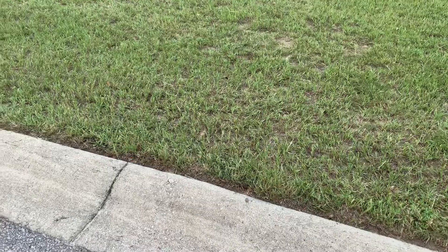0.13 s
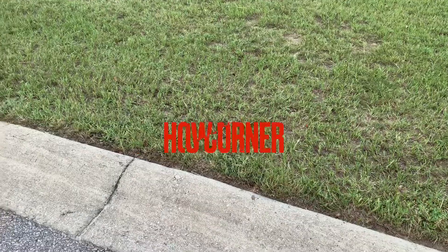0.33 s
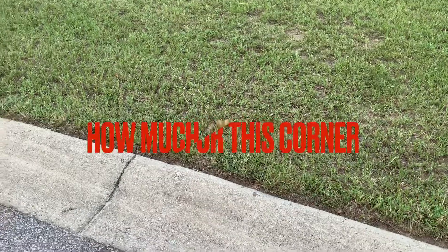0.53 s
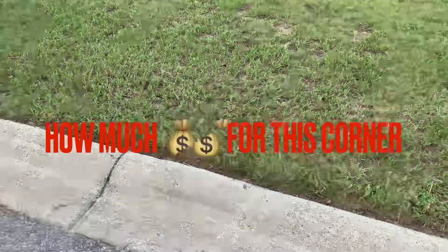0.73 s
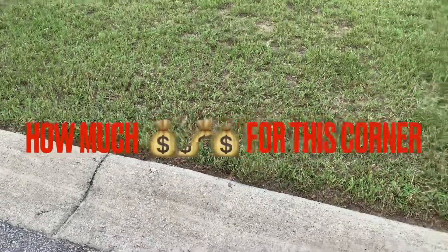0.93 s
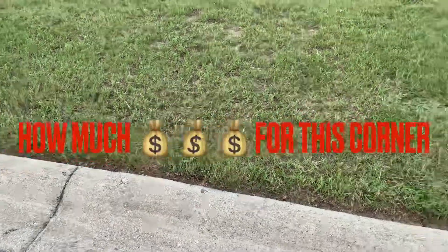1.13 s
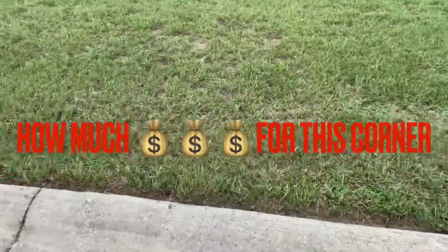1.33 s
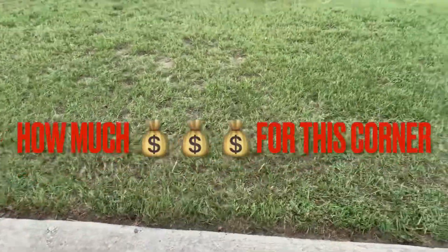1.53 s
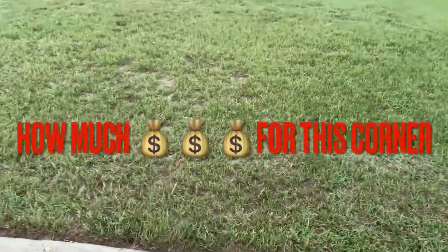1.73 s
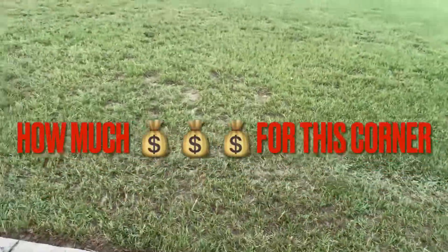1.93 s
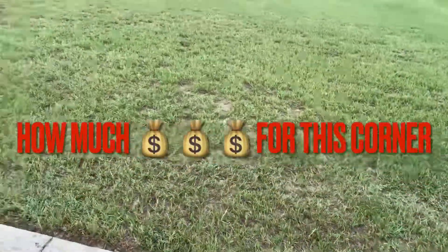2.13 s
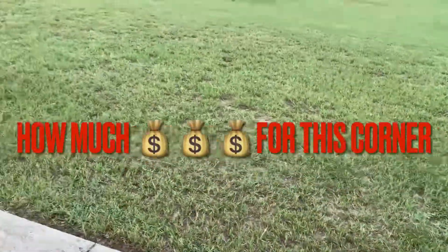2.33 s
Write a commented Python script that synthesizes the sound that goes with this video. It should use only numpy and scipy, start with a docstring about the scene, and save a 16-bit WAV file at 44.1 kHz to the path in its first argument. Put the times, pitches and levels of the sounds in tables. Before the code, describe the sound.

A small four-stroke lawn engine, already running, fades in quickly after a brief silence and chugs steadily outdoors; fan hum and a tinny rasp surround it, then dull wind thuds hit the handheld stereo microphone.

```python
"""After a brief silence a single-cylinder four-stroke lawn engine fades in quickly outdoors, already running.
Each cycle brings low thumps, pitch-falling putts, muffler ringing and gated gas and valve noise;
sinusoids at multiples of the firing rate and shaped noise make the hum and rush of its fan, with a tinny rasp.
From about 0.6 s the bass rises and dull thuds join the breeze at the two microphone ports;
toward the end the exhaust's upper bark and the bass subside."""
import sys
import numpy as np
from scipy import signal
from scipy.fft import rfft, irfft
from scipy.io import wavfile

SR = 44100
rng = np.random.default_rng(int(sys.argv[2]) if len(sys.argv) > 2 else 0)


def bounce(signal):
    """Save signal as a 16-bit WAV file at the path given by the first command-line argument."""
    frames = np.transpose(np.atleast_2d(signal))
    limited = np.clip(frames, -1, 1)
    pcm = np.round(limited * 32767).astype(np.int16)
    wavfile.write(sys.argv[1], SR, pcm)


N = 105795
T, HZ = np.arange(N) / SR, np.fft.rfftfreq(N, 1 / SR)

# Wind turbulence at the ports, before the bass curve: (frequency [Hz], density [dB per Hz])
WIND_SPECTRUM = [(15, -84), (27, -79), (45, -52.5), (72, -50), (110, -59.5), (180, -59), (300, -62.5),
                 (800, -95), (4000, -130)]
# Common level of wind and boom: (time [s], level [dB])
BASS_LEVEL = [(0, -7), (.59, -14.5), (.625, 2), (.9, 0.5), (1, 1), (1.12, 6), (1.24, 0.5), (1.31, .5),
              (1.45, 0), (1.55, -2), (1.82, -1.5), (1.86, -4), (2.12, -7.5), (2.16, -4.5), (2.4, -3.5)]
# Heaviest low thuds at the microphone: (time [s], peak level [dB], frequency [Hz])
THUDS = [(0.638, -22.5, 93), (0.687, -22, 81.6), (0.782, -29.5, 75), (0.834, -23.5, 81.6), (.897, -21, 85),
         (1.116, -28, 70), (1.166, -28.5, 76), (1.306, -18, 70.4), (1.366, -22, 80), (1.391, -18, 81),
         (1.46, -18, 84), (1.618, -25.5, 91), (1.822, -21, 89), (2.153, -25, 65), (2.267, -25, 65)]
THUD_SIGMA_S = 0.0065

# Fan and blade tones: (multiple of firing rate, rounded in use [1], level [dB], waver [0-1])
FAN_TONES = [(12, -35.5, 0.29), (19, -45.5, 0.6), (24, -39, 0.96), (32, -41.5, 0.1), (36, -48, 0.9),
             (73.6, -62, 0.3), (87.8, -55, 0.4), (95.4, -57, 0.4), (118.6, -57, 0.9)]
TONE_WAVER_HZ = 6.9
# Fan rush before its level curves: (frequency [Hz], density [dB per Hz])
RUSH_SPECTRUM = [(20, -69), (60, -70), (190, -60), (280, -67), (355, -65.5), (440, -66), (490, -61.5),
                 (700, -61.5), (1000, -66.5), (1140, -69), (1550, -72), (1680, -75.5), (1850, -74.5),
                 (2600, -75.5), (3200, -82), (4000, -85.5), (5000, -88), (7000, -91.5), (8400, -87),
                 (9500, -94), (10600, -101), (12300, -98), (15300, -103)]
# Overall level of the rush: (time [s], level [dB])
RUSH_LEVEL = [(.1, 1), (.5, 1.5), (.9, 0), (1.2, -0.5), (1.5, 0), (1.9, 0), (2.4, 0)]
# Level of the rush's top treble: (time [s], level [dB])
TREBLE_LEVEL = [(.1, -2.5), (.45, -2), (.9, 2.5), (1.3, 3), (1.8, 0.5), (2.4, 2.5)]
TREBLE_HZ = 8060
# Level of the rush near 3 kHz: (time [s], level [dB])
RIM_LEVEL = [(.1, -3), (.8, 0.5), (1.5, -2), (1.8, 4), (2.4, 0.5)]
RIM_HZ, RIM_HALF_WIDTH_HZ = 2820, 300
FLUTTER_DB, FLUTTER_HZ, SWELL_DB, SWELL_HZ = 1, 154, 1.22, 5.5
# Housing whistles in the air stream: (frequency [Hz], pole-pair width [Hz], level [dB])
WHISTLES = [(1887, 26, -59.5), (2770, 53, -59), (4214, 53, -66), (5350, 28, -65.5)]

# Tinny rasp, its colour shifting as the microphone moves: (time [s], centre [Hz], level [dB])
RASP = [(0.099, 2160, -41.5), (0.401, 2155, -45), (.7, 1995, -44.5), (.98, 1965, -42.5),
        (1.12, 2060, -40.5), (1.25, 2120, -37), (1.42, 2040, -41), (1.6, 2100, -42), (1.75, 2520, -57),
        (1.949, 2540, -47.5), (2.149, 2570, -48), (2.4, 2440, -44)]
RASP_POLE_WIDTH_HZ, RASP_PULSE_DB, RASP_PLACE = 320, 2, 0.91  # place in cycles
RASP_GRAIN_DB, RASP_GRAIN_HZ = 1.9, 110
RASP_EVEN = 0.24  # 0 = the band flickers freely, 1 = its envelope is constant

# Engine speed: (time [s], firing rate [firings per second])
FIRING_RATE = [(0.0, 18.561), (0.5, 18.685), (0.66, 17.96), (0.85, 17.978), (0.96, 18.253), (1.08, 17.951),
               (1.17, 18.488), (1.26, 17.913), (1.34, 18.755), (1.44, 18.166), (1.54, 18.441),
               (1.68, 17.91), (1.86, 18.407), (1.94, 18.108), (2.07, 18.552), (2.27, 17.871), (2.4, 18.3)]
START_CYCLE = .235
FIRING_SPREAD_DB, TIMING_SPREAD_S = -0.3, 0.00017
# Deep boom, before the bass curve: (place [cycles], frequency [Hz], pole-pair width [Hz], level [dB])
BOOM = [(0.759, 77, 89, -50)]
BOOM_SPREAD_DB = -1.5
# Low thumps in block and deck: (place [cycles], frequency [Hz], pole-pair width [Hz], level [dB])
THUMPS = [(0.57, 68.4, 42, -40), (.56, 165, 66.5, -39), (0.55, 264, 37, -47), (.05, 390, 35, -41.5)]

# Exhaust strength, for putts and muffler: (time [s], level [dB])
EXHAUST_EFFORT = [(.14, -1.5), (.3, -1.5), (.38, -7.5), (.52, -5.5), (.58, -5.5), (.68, -1.5), (.96, 3),
                  (1.06, -1), (1.13, -0.5), (1.22, -9), (1.34, -8.5), (1.42, -1.5), (1.52, -7.5), (1.62, 2),
                  (1.69, -12.5), (1.78, -5.5), (1.87, -0.5), (1.98, -6), (2.12, 4.5), (2.22, -3.5),
                  (2.29, -0.5), (2.34, -13), (2.4, 6)]
# Muffler modes: (place [cycles], frequency [Hz], pole-pair width [Hz], level before bark [dB])
MUFFLER = [(0.9, 588, 60, -45), (.78, 795, 42, -47), (.75, 990, 80, -46.5)]
# Gas and valve noise: (place [cycles], Gaussian sigma [cycles], frequency [Hz], pole-pair width [Hz],
# level before bark [dB])
BURSTS = [(1.03, .1, 736, 240, -43), (0.74, 0.061, 1453, 250, -52.5), (0.95, 0.072, 1310, 280, -48.5),
          (0.7, 0.16, 1826, 260, -50.5), (0.9, 0.13, 3070, 760, -54), (0.65, 0.085, 4480, 1600, -60),
          (0.1, 0.049, 8700, 1300, -64)]
# Falling putts: (place [cycles], nominal first [Hz], nominal last [Hz], fall time constant [s],
# peak time [s], Gaussian sigma [s], roughness [0-1], level before bark [dB])
PUTTS = [(.7, 1650, 555, 0.007375, 0.017, 0.01, .27, -37), (0.02, 1400, 350, .007, 0.027, 0.015, .5, -47)]
PUTT_S, PUTT_PITCH_SPREAD, PUTT_ROUGH_HZ = 0.043, 0.026, 101
# Exhaust-pipe response to the putts: (frequency [Hz], gain [dB])
PIPE = [(380, -1), (435, -2), (500, -2), (590, 4.5), (680, -5), (790, 2), (880, -2), (980, 7.5),
        (1150, -4.5), (1400, 0)]
# Level of the exhaust's upper bark: (time [s], level [dB])
BARK_LEVEL = [(.1, -3), (.5, 6), (.7, 1), (1, -2.5), (1.15, 2), (1.4, 3), (1.7, 2.5), (2, -0.5),
              (2.4, -6.5)]
BARK_HZ, BARK_HALF_WIDTH_HZ = 850, 210

# Phase between ports: (frequency [Hz], lead of left over right [rad])
PORT_LEAD = [(20, 0), (200, .15), (290, .5), (430, 2.3), (600, 1.4), (950, 1.4), (1500, .7), (2000, -.6),
             (2900, -2.4), (6000, -2.3), (6900, -3.05), (7500, -3.3), (9200, -6.2), (10200, -6.4),
             (10900, -9.3), (12200, -9.5), (13300, -12.4), (15200, -12.8)]
# Level between ports: (frequency [Hz], left minus right [dB])
PORT_TILT = [(20, -5), (110, 2), (170, -4), (270, -3.5), (350, -3.5), (435, 4.5), (520, -6), (600, 8.5),
             (700, -5), (900, 3), (1200, 0.5), (2150, 4.5), (3000, 0.5), (5000, 1), (15000, -1)]
# Noise shared by the ports: (frequency [Hz], coherence amplitude [0-1])
PORT_LIKENESS = [(20, .96), (200, .94), (300, .65), (600, .8), (1000, .72), (1400, .55), (2200, .8),
                 (3300, .62), (4600, .15), (6000, .6), (7300, .92), (9000, .92), (11500, .97), (15000, .9)]
FADE_START_S, FADE_S = 0.072, 0.072
EDGE_HZ = 15450


def amp(db):
    """Logarithmic level law: decibels to linear gain."""
    return 10 ** (np.asarray(db) / 20)


def unit(x):
    """Power normalization: scales a signal to rms 1."""
    return x / np.sqrt(np.mean(x ** 2) + 1e-20)


def over_time(points):
    """Linear interpolation of a time curve at every sample."""
    return np.interp(T, *np.transpose(points))


def over_pitch(points):
    """Interpolation of a spectrum along logarithmic frequency."""
    f, value = np.transpose(points)
    return np.interp(np.log(HZ + 1), np.log(f + 1), value)


def shaped(x, gain):
    """Linear filtering: multiplication of a spectrum by a frequency response."""
    return irfft(rfft(x) * gain, N)


def bell(centre_hz, half_width_hz):
    """Band selection by a flat-topped magnitude response, one half at its half width."""
    return 1 / (1 + ((HZ - centre_hz) / half_width_hz) ** 4)


def resonance(hz, width):
    """Causal damped resonance: one pole pair applied twice."""
    return (1j * HZ * width / (hz ** 2 - HZ ** 2 + 1j * HZ * width)) ** 2


def drift(rate_hz):
    """Random modulation: low-passed noise of zero mean and rms 1."""
    return unit(shaped(rng.standard_normal(N), (HZ > 0) / (1 + (HZ / rate_hz) ** 4)))


def air():
    """Partial coherence: white noise that two ports share in part."""
    a, b = rng.standard_normal((2, N))
    same = np.clip(over_pitch(PORT_LIKENESS), 0, 1)
    right = shaped(a, same) + shaped(b, np.sqrt(1 - same ** 2))
    return np.array([a, right])


def wind():
    """Turbulent pressure: predominantly low-frequency noise on the microphone."""
    return shaped(air(), amp(over_pitch(WIND_SPECTRUM)) * np.sqrt(SR / 2))


def thuds():
    """Transient pressure pulses: Gaussian-gated low sines, alike before the port response."""
    out = np.zeros(N)
    for (s, db, hz), phase in zip(THUDS, rng.random(len(THUDS))):
        gate = np.exp(-.5 * ((T - s) / THUD_SIGMA_S) ** 2)
        out += amp(db) * gate * np.sin(2 * np.pi * (hz * (T - s) + phase))
    return out


def fan_hum(cycles):
    """Harmonic radiation: randomly wavering tones locked to the engine cycle."""
    out = np.zeros(N)
    for multiple, db, waver in FAN_TONES:
        wander = 1 + waver * (drift(TONE_WAVER_HZ) + 1j * drift(TONE_WAVER_HZ))
        tone = wander * np.exp(2j * np.pi * round(multiple) * cycles)
        out += amp(db) * unit(tone.real)
    return out


def fan_rush():
    """Broadband flow noise: shaped noise whose whole level and upper bands vary."""
    flutter = unit(amp(FLUTTER_DB * drift(FLUTTER_HZ) + SWELL_DB * drift(SWELL_HZ)))
    rush = shaped(air(), amp(over_pitch(RUSH_SPECTRUM)) * np.sqrt(SR / 2))
    treble = shaped(rush, 1 - 1 / (1 + (HZ / TREBLE_HZ) ** 6))
    rush = rush + (amp(over_time(TREBLE_LEVEL)) - 1) * treble
    rush = rush + (amp(over_time(RIM_LEVEL)) - 1) * shaped(rush, bell(RIM_HZ, RIM_HALF_WIDTH_HZ))
    return amp(over_time(RUSH_LEVEL)) * flutter * rush


def housing_whistles():
    """Resonance in an air stream: narrow modes excited by one noise."""
    stream = air()
    return sum(amp(db) * unit(shaped(stream, resonance(hz, width))) for hz, width, db in WHISTLES)


def rasp(cycles):
    """Amplitude modulation: a thin noise band shaken once each revolution, twice a cycle."""
    s, hz, db = np.transpose(RASP)
    pulse_db = RASP_PULSE_DB * np.cos(4 * np.pi * (cycles - RASP_PLACE))
    shake = amp(pulse_db + RASP_GRAIN_DB * drift(RASP_GRAIN_HZ))
    # Noise is low-passed in a frame that rotates at the moving centre frequency.
    carrier = np.exp(2j * np.pi * np.cumsum(np.interp(T, s, hz)) / SR)
    pole = np.exp(-np.pi * RASP_POLE_WIDTH_HZ / SR)
    band = carrier * signal.lfilter([1], np.poly([pole, pole]), air() / carrier)
    evened = band.real / (abs(band) + 1e-9) ** RASP_EVEN
    return amp(np.interp(T, s, db)) * unit(shake * evened)


def uneven(cycles, spread_db):
    """Cyclic variation: a random gain interpolated from cycle to cycle."""
    chance = rng.standard_normal(size=64)
    return amp(spread_db * np.interp(cycles, np.arange(len(chance)), chance))


def passes(cycles, place):
    """Phase crossing: the samples at which each cycle reaches a place."""
    return np.flatnonzero(np.diff(np.floor(cycles - place)))


def firings(cycles, force, modes):
    """Impulse excitation: a slightly mistimed pulse per cycle rings each mode."""
    out = np.zeros(N)
    for place, hz, width, db in modes:
        at = passes(cycles, place)
        late = np.round(rng.standard_normal(size=64)[:len(at)] * TIMING_SPREAD_S * SR).astype(int)
        at = np.clip(at + late, 0, N - 1)
        pulses = np.zeros(N)
        pulses[at] = force[at]
        out += amp(db) * unit(shaped(pulses, resonance(hz, width)))
    return out


def chuffs(cycles, force):
    """Periodic flow and valve noise: resonant bands gated at fixed places in the cycle."""
    out = np.zeros((2, N))
    for place, sigma, hz, width, db in BURSTS:
        distance = (cycles - place + .5) % 1 - .5
        gate = np.exp(-.5 * (distance / sigma) ** 2)
        out += amp(db) * unit(shaped(air(), resonance(hz, width)) * gate * force)
    return out


def putts(cycles, force):
    """Frequency glide: tones of random pitch fall through the pipe's response each cycle."""
    t, out = np.arange(0, PUTT_S, 1 / SR), np.zeros(N)
    for place, first_hz, last_hz, fall_s, peak_s, sigma_s, rough, db in PUTTS:
        hz = last_hz + (first_hz - last_hz) * np.exp(-t / fall_s)
        onset = 1 - np.exp(-2 * t / fall_s)
        swell = np.exp(-.5 * ((t - peak_s) / sigma_s) ** 2) * onset
        train = np.zeros(N + len(t), complex)
        for at, chance in zip(passes(cycles, place), rng.standard_normal(size=64)):
            phase = 2 * np.pi * np.cumsum(hz * (1 + PUTT_PITCH_SPREAD * chance)) / SR
            train[at:at + len(t)] += swell * np.exp(1j * phase)
        grit = 1 + rough * (drift(PUTT_ROUGH_HZ) + 1j * drift(PUTT_ROUGH_HZ))
        rough_train = (train[:N] * grit * force).real
        out += amp(db) * unit(shaped(rough_train, amp(over_pitch(PIPE))))
    return out


def exhaust(cycles, force):
    """Pulsed discharge: putts, muffler modes and gas noise share a varying upper bark."""
    push = force * amp(over_time(EXHAUST_EFFORT))
    out = putts(cycles, push) + firings(cycles, push, MUFFLER) + chuffs(cycles, force)
    bark = shaped(out, bell(BARK_HZ, BARK_HALF_WIDTH_HZ))
    return out + (amp(over_time(BARK_LEVEL)) - 1) * bark


def scene():
    """Superposition: breeze, fan, rasp and engine pressures add."""
    cycles = START_CYCLE + np.cumsum(over_time(FIRING_RATE)) / SR
    force = uneven(cycles, FIRING_SPREAD_DB)
    boom = firings(cycles, uneven(cycles, BOOM_SPREAD_DB), BOOM)
    bass = amp(over_time(BASS_LEVEL)) * (wind() + boom)
    fan = fan_hum(cycles) + fan_rush() + housing_whistles()
    thumps = firings(cycles, force, THUMPS)
    return bass + thuds() + fan + rasp(cycles) + thumps + exhaust(cycles, force)


def record(dry):
    """Two-port reception: phase and level differences, then a fade-in and a band limit."""
    half = amp(over_pitch(PORT_TILT) / 2) * np.exp(.5j * over_pitch(PORT_LEAD))
    fade = np.clip((T - FADE_START_S) / FADE_S, 0, 1)
    heard = shaped(dry, np.array([half, 1 / half])) * fade
    low_pass = signal.firwin(511, EDGE_HZ, window=("kaiser", 9), fs=SR)
    return signal.oaconvolve(heard, low_pass[None], "same")


dry = scene()
out = record(dry)
bounce(out)
```